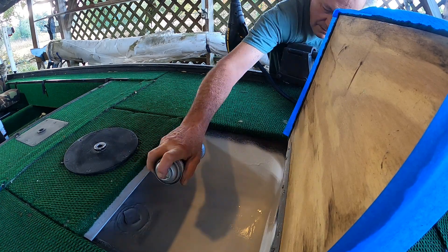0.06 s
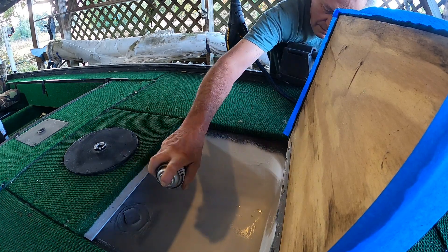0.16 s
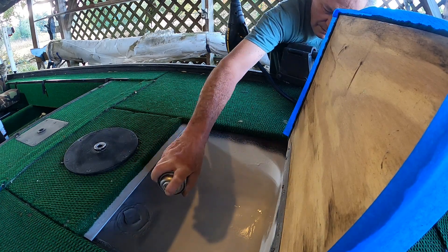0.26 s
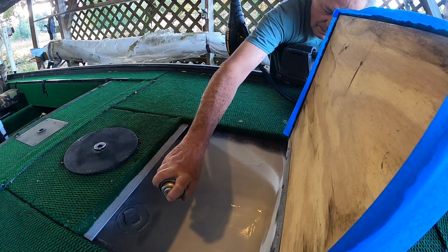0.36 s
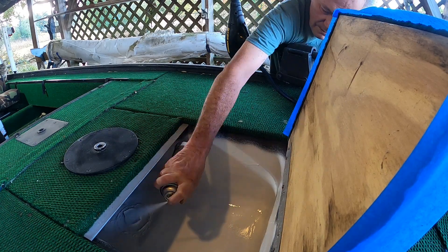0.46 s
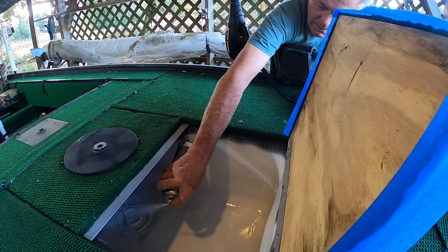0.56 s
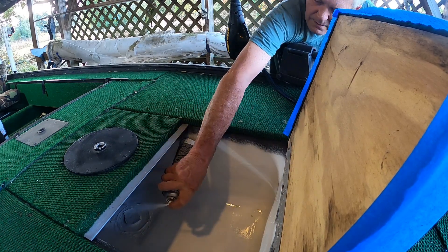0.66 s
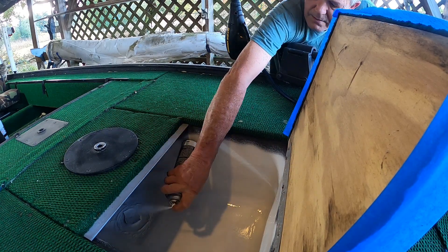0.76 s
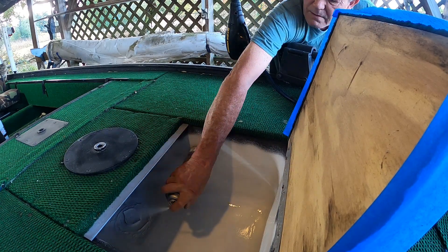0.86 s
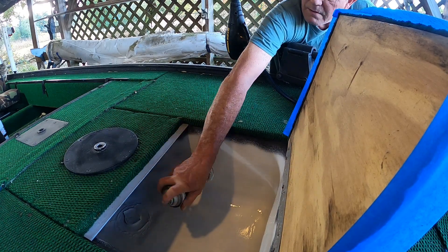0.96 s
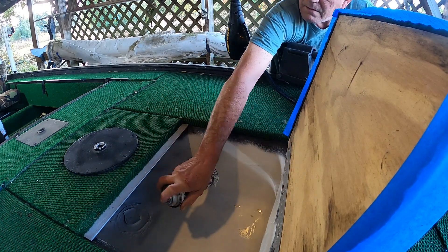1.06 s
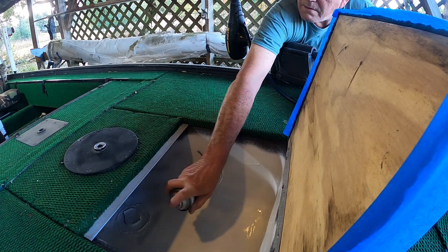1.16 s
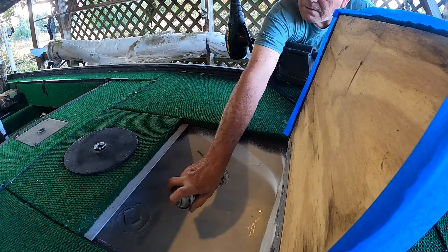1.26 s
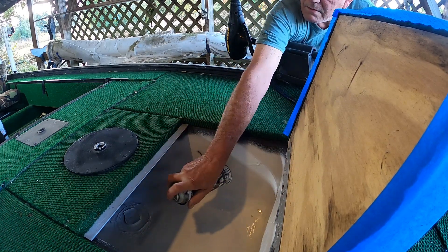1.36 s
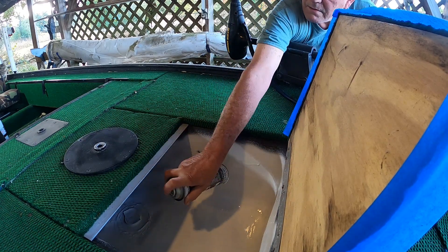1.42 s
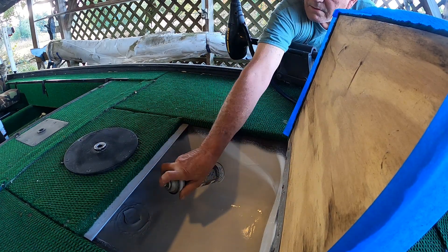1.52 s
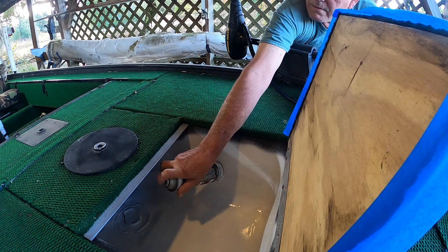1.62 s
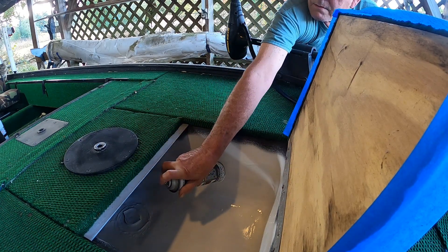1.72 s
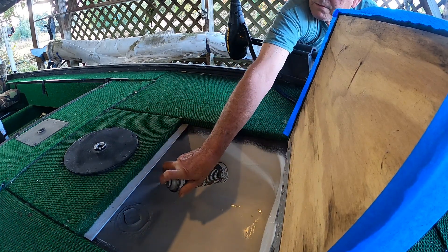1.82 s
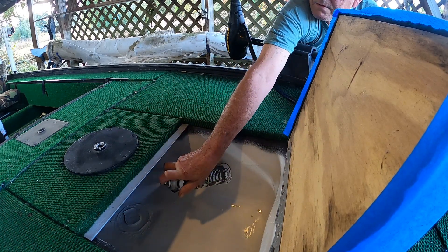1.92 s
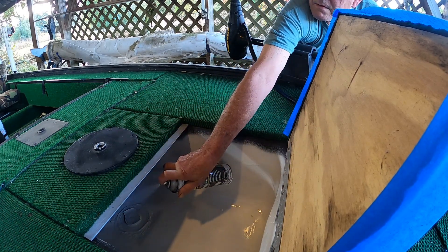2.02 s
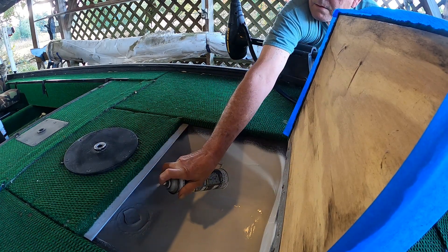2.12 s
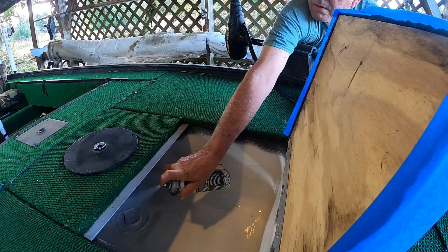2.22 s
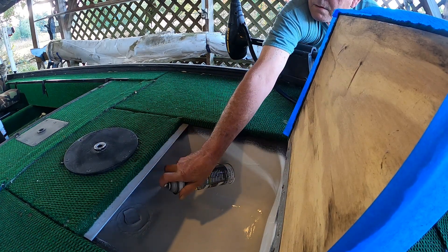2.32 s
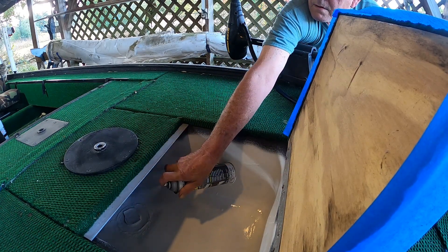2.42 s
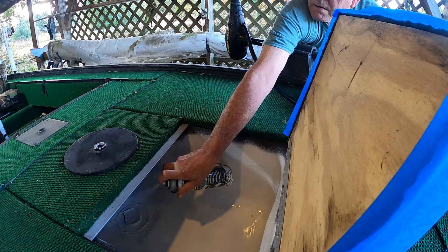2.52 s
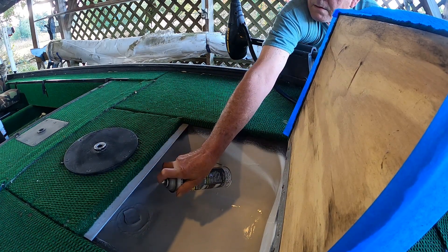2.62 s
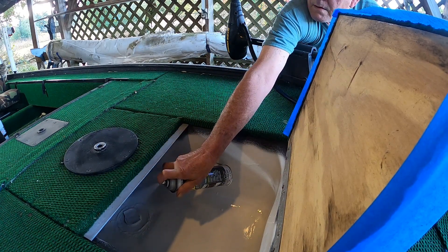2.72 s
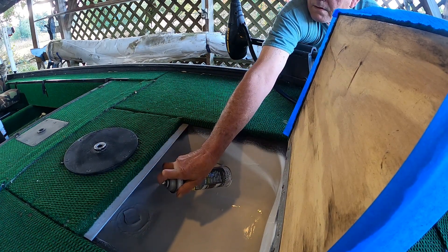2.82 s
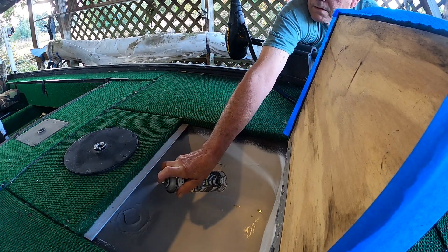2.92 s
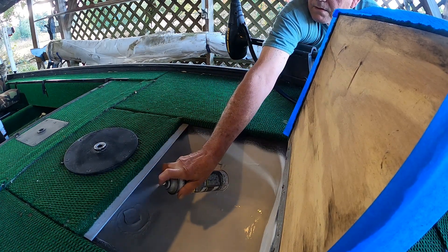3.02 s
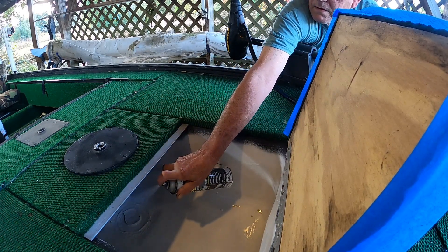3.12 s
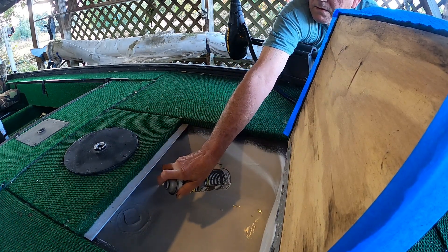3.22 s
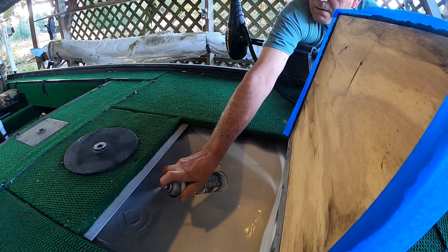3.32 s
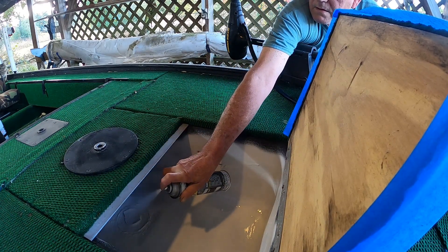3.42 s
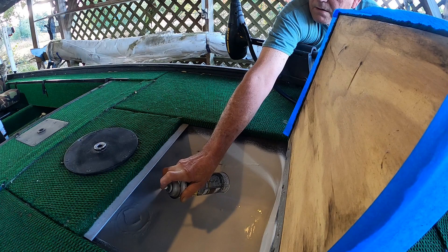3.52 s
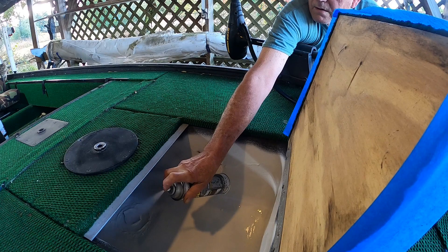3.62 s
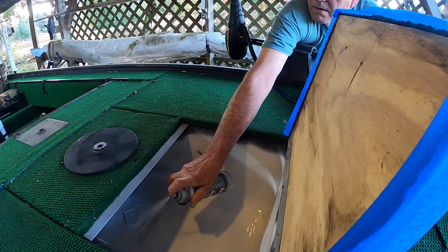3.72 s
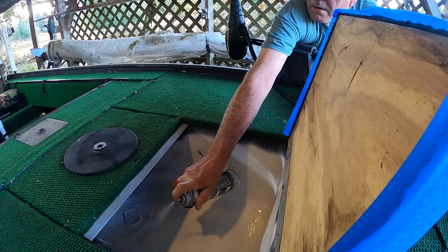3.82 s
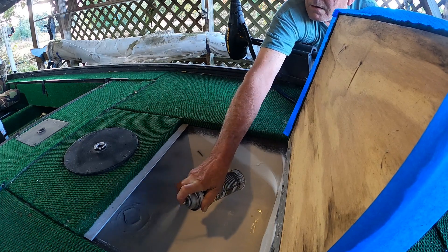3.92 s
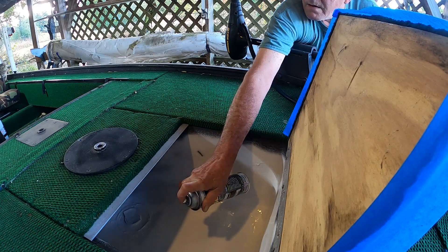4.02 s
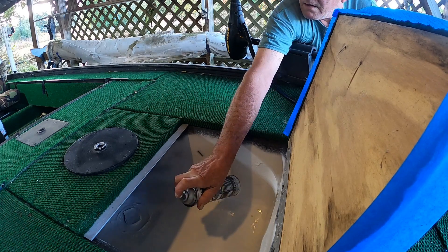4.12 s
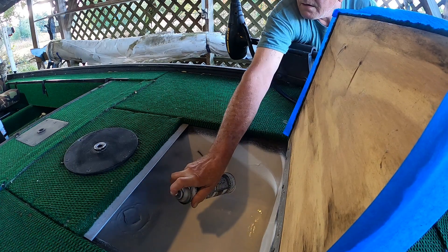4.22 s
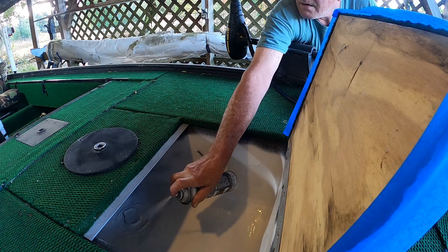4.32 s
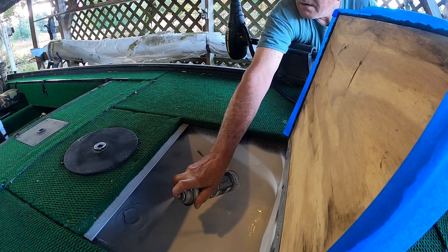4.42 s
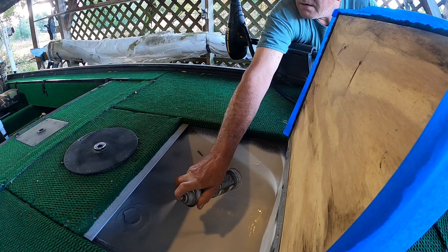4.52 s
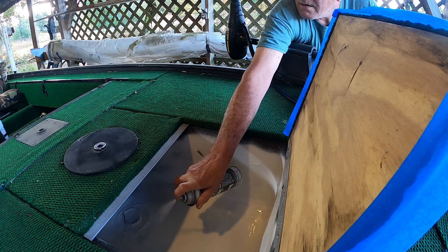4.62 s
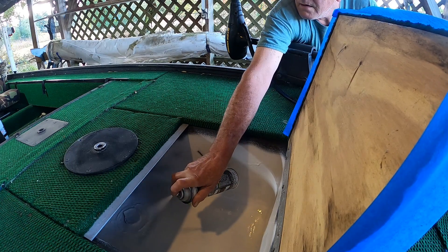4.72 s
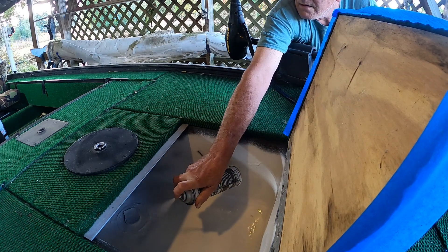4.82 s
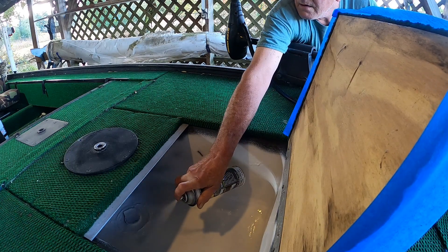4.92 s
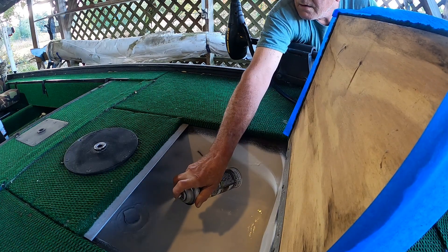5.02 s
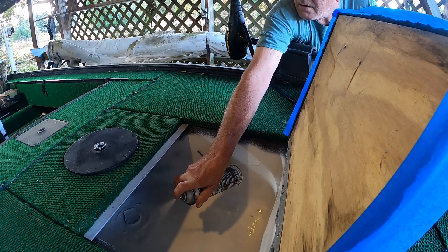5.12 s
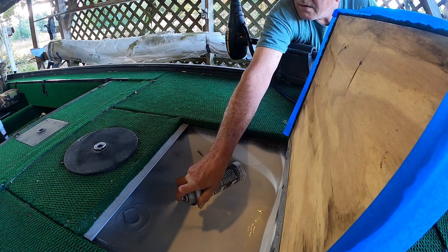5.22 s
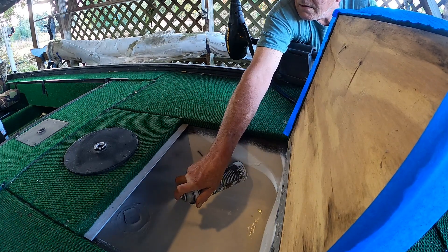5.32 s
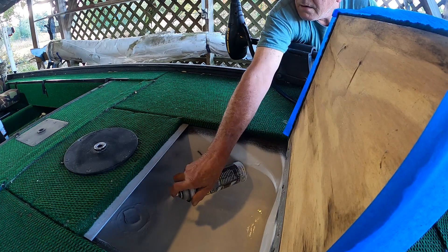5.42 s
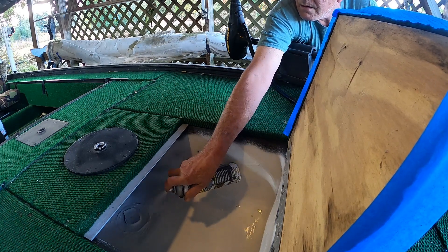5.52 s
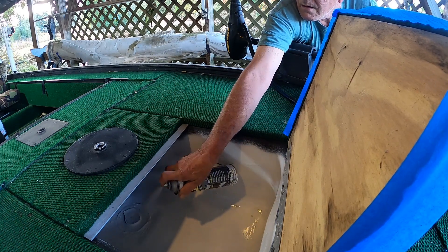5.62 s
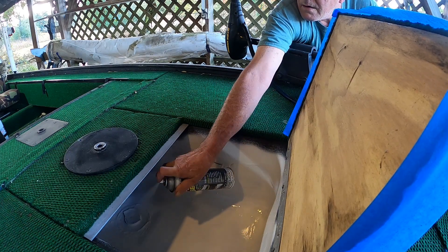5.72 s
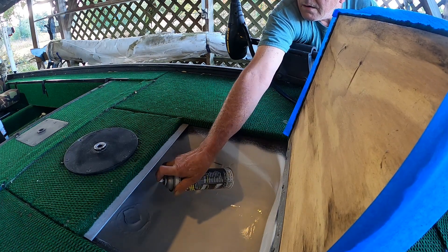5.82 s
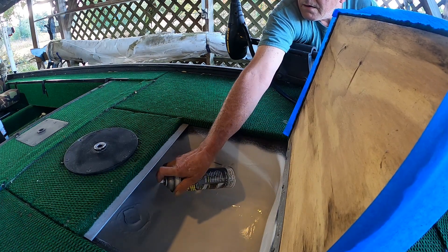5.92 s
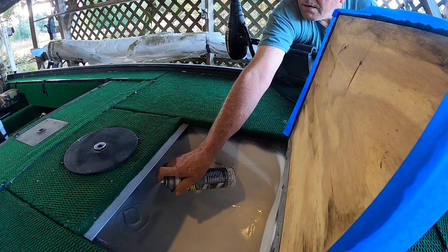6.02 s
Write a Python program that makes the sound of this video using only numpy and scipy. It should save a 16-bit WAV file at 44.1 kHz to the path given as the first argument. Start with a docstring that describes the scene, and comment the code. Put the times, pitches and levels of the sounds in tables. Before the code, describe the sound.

Bright, then duller spray-can hiss echoes in a small boat compartment, between woody thumps and a rising breeze rumbling close to the microphone.

```python
"""Faint handling ticks and a low wind rumble open the scene; then an aerosol can sprays into a boat hatch.
Spray: three passes of coloured noise start bright, the last two turn duller as the top fizz fades;
hatch echoes, resonances and gliding gap tones colour the hiss. Knocks: noise thuds, deck modes, hull boom.
Wind: low noise bands on the microphone follow a breeze, rising overall, and single gusts.
Can handling is short resonant noise; a short roof echo and faint air noise surround it all."""
import sys
import numpy as np
from scipy import signal
from scipy.fft import rfft, irfft, next_fast_len
from scipy.io import wavfile
from scipy.ndimage import map_coordinates

SR = 44100
rng = np.random.default_rng(int(sys.argv[2]) if len(sys.argv) > 2 else 0)


def generate_wav(sig):
    """Save sig (samples, or channels by samples) to the path in sys.argv[1] as 16-bit PCM at SR."""
    pcm = np.round(np.clip(np.atleast_2d(sig).T, -1, 1) * 32767).astype(np.int16)
    wavfile.write(sys.argv[1], SR, pcm)


N = 267246


def amp(db):
    """Decibels to gain."""
    return 10 ** (np.asarray(db) / 20)


def unit(x):
    """Scale to rms 1."""
    return x / np.sqrt(np.mean(x ** 2) + 1e-20)


def along(points, hz):
    """Interpolate (f/Hz, value) points on a log-frequency axis."""
    f, v = np.transpose(points)
    return np.interp(np.log(hz + 1), np.log(f + 1), v)


def curves(rows):
    """Interpolate each column after t/s to one value per sample."""
    s, *cols = np.transpose(rows)
    return [np.interp(np.arange(N) / SR, s, c) for c in cols]


def ramp(u):
    """Smooth step from 0 to 1 as u goes from 0 to 1."""
    return np.sin(np.pi / 2 * np.clip(u, 0, 1)) ** 2


def swell(s, length_s):
    """Bell-shaped rise and fall around time s; falls to exp(-2) at +-length_s."""
    return np.exp(-2 * ((np.arange(N) / SR - s) / length_s) ** 2)


def wobble(rate_hz):
    """Smooth random curve through rate_hz Gaussian knots a second."""
    coarse = np.arange(0, N + 64, 64)
    knots = rng.standard_normal(400)
    smooth = map_coordinates(knots, [coarse * rate_hz / SR], mode="mirror")
    return np.interp(np.arange(N), coarse, smooth)


def filtered(x, response):
    """Apply a gain response of frequency, zero-padded against wrap-around."""
    size = x.shape[-1]
    m = next_fast_len(size + SR // 4)
    spectrum = rfft(x, m) * response(np.fft.rfftfreq(m, 1 / SR))
    return irfft(spectrum, m)[..., :size]


def noise(spectrum, size=N):
    """Gaussian noise of rms 1 with the given spectral shape."""
    white = rng.standard_normal(size)
    return unit(filtered(white, lambda hz: amp(along(spectrum, hz))))


def add(track, s, sound):
    """Mix a sound into the track at time s."""
    part = track[round(s * SR):][:len(sound)]
    part += sound[:len(part)]


# faint hiss of the surroundings: t/s, level/dB
AMBIENCE_S_DB = [(.4, -70), (1.15, -62.5), (1.85, -58.5), (4.2, -68.5)]
# its spectral shape: f/Hz, relative level/dB per Hz
AIR_HZ_DB = [(200, 25), (600, 10), (1800, 7.5), (4000, 2.5), (7500, -0.5), (9500, -7.5), (12000, -48)]


def ambience():
    """Air noise of the surroundings, slowly changing in level."""
    level_db, = curves(AMBIENCE_S_DB)
    return amp(level_db) * noise(AIR_HZ_DB)


# breeze on the microphone: t/s, rumble level/dB
BREEZE_S_DB = [(0.0, -42.5), (0.86, -45.5), (1.1, -39), (2.28, -36.5), (2.56, -30.5), (3.14, -27.5),
               (3.53, -40), (3.91, -40), (5.13, -23.5), (6.06, -32.5)]
# single gusts: t/s, half-length/s, rumble level/dB, flutter re rumble/dB before trim
GUSTS = [(0.517, .09, -40.5, -4.5), (0.978, 0.065, -27, -1), (1.262, 0.102, -29.5, -20),
         (1.598, 0.048, -28, -20), (2.068, 0.1, -37, 6.5), (2.45, 0.055, -23, -12.5),
         (2.72, .1, -26.5, -11), (3.06, 0.2, -26, -5), (3.324, .12, -26.5, -9), (3.63, .08, -34, -23),
         (3.88, .1, -34, -9.5), (4.257, 0.098, -27, -11.5), (4.428, 0.12, -27.5, 0), (4.79, 0.14, -25, 7.5),
         (5.044, 0.11, -24, 5), (5.475, .14, -23, -3.5), (5.72, 0.33, -23.5, 0), (5.938, 0.091, -23, -10.5)]
# spectral shapes: f/Hz, relative level/dB per Hz
RUMBLE_HZ_DB = [(10, -11), (25, -2), (50, 1.5), (85, -4), (125, -4.5), (190, -19), (400, -82)]
FLUTTER_HZ_DB = [(60, -9), (120, 0.5), (165, 1), (220, -2.5), (300, -11.5), (450, -23.5), (800, -33.5),
                 (2000, -51.5), (5000, -87)]
BREEZE_FLUTTER_DB, FLUTTER_TRIM_DB = -6.5, -4.5  # breeze flutter re rumble before trim; trim of all flutter


def wind():
    """Gusts add in power to the breeze; large eddies rumble, small ones flutter in quick lumps."""
    breeze_db, = curves(BREEZE_S_DB)
    large, small = amp(breeze_db), amp(breeze_db + BREEZE_FLUTTER_DB)
    for s, length_s, db, flutter_db in GUSTS:
        gust = amp(db) * swell(s, length_s)
        large = np.hypot(large, gust)
        small = np.hypot(small, amp(flutter_db) * gust)
    eddies = wobble(25)
    rumble = large * unit(noise(RUMBLE_HZ_DB) * amp(1.02 * eddies))
    flutter = small * unit(noise(FLUTTER_HZ_DB) * amp(eddies + 2.77 * wobble(35)))
    return rumble + amp(FLUTTER_TRIM_DB) * flutter


# echo under the roof: f/Hz, t60/s
SHELTER_HZ_T60 = [(150, 0.37), (1000, 0.18), (4000, 0.13), (14000, 0.14)]


def shelter(x):
    """Short roof echo: convolution with noise decaying at its own t60 per frequency."""
    hz, t, z = signal.stft(rng.standard_normal(SR // 2), SR, nperseg=256)
    decay = amp(-60 * t / along(SHELTER_HZ_T60, hz)[:, None])
    tail = signal.istft(z * decay, SR, nperseg=256)[1]
    return signal.fftconvolve(x, tail / np.linalg.norm(tail))[:N]


# can and nozzle handling: t/s, level/dB, f/Hz, width/Hz, t60/s
CLICKS = [(.005, -60, 2840, 4000, 0.25), (0.085, -64, 2100, 1500, 0.48), (0.134, -63, 1930, 1490, 0.3),
          (0.288, -69.5, 1500, 1190, 0.31), (.573, -55.5, 2230, 355, 1), (1.089, -27.5, 1810, 2940, 0.04),
          (1.289, -58, 1590, 790, 0.046), (1.331, -47, 2170, 2980, 0.093)]
CLICK_RISE_S = .0005


def clicks():
    """Fingers tick on the nozzle and rub the can: decaying noise in one resonance each."""
    track, t = np.zeros(N), np.arange(SR // 4) / SR
    for s, db, hz, width_hz, t60_s in CLICKS:
        def colour(f):
            """Band-pass resonance with a treble roll-off."""
            return f * width_hz / np.hypot(hz ** 2 - f ** 2, f * width_hz) / (1 + (f / 7000) ** 2)

        tick = unit(filtered(rng.standard_normal(len(t)), colour))
        add(track, s, tick * amp(db - 60 * t / t60_s) * (1 - np.exp(-t / CLICK_RISE_S)))
    return track


# blows on the deck: t/s, level/dB, thud hardness/dB, mode tilt/(dB/octave)
KNOCKS = [(.866, -13, 8, -10), (0.876, -11, -15, -2), (0.997, -25.5, 3, 4.5), (1.022, -33, 11, -2),
          (1.759, -15.5, -2, -2.5), (1.795, -16.5, -14.5, -5), (2.534, -11.5, 0.5, -0.5),
          (2.55, -19.5, 1, -5), (2.583, -16, -3.5, -2), (5.41, -14, 5, -6.5), (5.65, -24.5, 7, 3)]
# deck modes: f/Hz, relative level/dB, t60/s
DECK_MODES = [(108.6, -1, .15), (137, -3, .2), (187, 1, 0.24), (300, -3.5, .22), (379, -20, 0.1),
              (447, -13.5, 0.24), (530, -14, 0.15), (962, -22, 0.068), (1207, -15.5, 0.091),
              (1715, -32, .1)]
# spectral shapes of thud and of the hull's many close modes: f/Hz, relative level/dB per Hz
THUD_HZ_DB = [(60, -50), (150, -4.5), (400, 1.5), (700, -7.5), (1000, 0.5), (1700, -9), (2500, -16),
              (5000, -31), (9000, -69.5)]
HULL_HZ_DB = [(60, -19), (130, 13.5), (250, -5.5), (400, -2), (700, -8.5), (2000, -68.5)]


def knocks(thud_t60_s=0.082, hull_t60_s=0.33, swell_s=0.0004, rise_s=0.0029, pivot_hz=170):
    """Each blow gives a short woody thud, rings the hollow deck's modes and booms the hull."""
    track, t = np.zeros(N), np.arange(SR // 2) / SR
    hz, mode_db, t60_s = np.transpose(DECK_MODES)[:, :, None]
    for s, db, hard_db, tilt in KNOCKS:
        # the spot struck sets the balance of low and high modes
        tilt_db = tilt * np.log2(hz / pivot_hz)
        scatter_db = 2 * rng.standard_normal(hz.shape)
        strength = amp(mode_db + tilt_db + scatter_db - 60 * t / t60_s)
        pitch_hz = hz * (1 + 0.0068 * rng.standard_normal(hz.shape))
        cycles = pitch_hz * t + rng.random(hz.shape)
        ring = amp(-7.5) * np.sum(strength * np.sin(2 * np.pi * cycles), axis=0)
        boom = noise(HULL_HZ_DB, size=len(t)) * amp(-14.0 - 60 * t / hull_t60_s)
        thud = noise(THUD_HZ_DB, size=len(t)) * amp(hard_db - 7.5 - 60 * t / thud_t60_s)
        body = (ring + boom) * (1 - np.exp(-t / swell_s))
        add(track, s, amp(db) * (body + thud * (1 - np.exp(-t / rise_s))))
    return track


# passes: open t/s, shut t/s, rise/s, fall/s, then hiss, sizzle, core level/dB before the
# offsets in spray(), then delay from opening to the middle of the dulling/s
VALVE_PASSES = [(0.59, 1.046, 0.063, .035, -29, -41.5, -29.5, 1.0),
                (1.898, 4.107, 0.068, .04, -28.5, -40, -36, 0.94),
                (4.482, 6.2, 0.075, .04, -26.5, -40.5, -42, .35)]
DULLING_S = 0.1


def valve():
    """The finger works the nozzle: flow 0-1, dullness 0-1, and the pass's hiss, sizzle, core dB."""
    t = np.arange(N) / SR
    flow, dull, levels_db = np.zeros(N), np.zeros(N), np.zeros((3, N))
    for on, off, rise, fall, hiss_db, sizzle_db, core_db, bright_s in VALVE_PASSES:
        flow = flow + ramp((t - on) / rise) * ramp(1 - (t - off) / fall)
        dull = np.where(t >= on, ramp((t - on - bright_s) / DULLING_S + .5), dull)
        levels_db = np.where(t >= on, [[hiss_db], [sizzle_db], [core_db]], levels_db)
    return flow, dull, levels_db


EASE_S, EASE_IN_S, EASE_OUT_S, EASE_DB = 2.585, 0.07, 0.22, -11.5


def ease():
    """The finger slackens once and presses again: one smooth dip, in dB."""
    t = np.arange(N) / SR
    return EASE_DB * ramp(1 + (t - EASE_S) / EASE_IN_S) * ramp(1 - (t - EASE_S) / EASE_OUT_S)


# echoes off hatch walls and raised lid: delay/s, gain before power normalization
WALLS_S_GAIN = [(.0018, 0.32), (.0032, 0.24), (.0049, .18), (.0061, 0.079)]


def reflections(x, scatter, sway_s, sway_rate_hz, longest_s, count=14):
    """Delayed copies off the hatch; path lengths wander with the hand, so ripples drift in the hiss."""
    draws = rng.random((count, 2))
    small = [(longest_s * (.1 + .9 * far), scatter * np.sign(side - .5)) for far, side in draws]
    paths = list(WALLS_S_GAIN) + small
    fine = signal.resample_poly(x, 4, 1)  # quarter-sample delays
    out = x.copy()
    for delay_s, gain in paths:
        at = np.arange(N) - SR * (delay_s + sway_s * wobble(sway_rate_hz))
        index = np.clip(np.round(4 * at).astype(int), 0, len(fine) - 1)
        out += gain * fine[index]
    return out / np.sqrt(1 + sum(gain ** 2 for _, gain in paths))


# air resonances of the hatch: f/Hz, width/Hz, lift/dB (overlaps add)
HATCH_MODES = [(1185, 200, 4), (1487, 87, 7), (1823, 79, 4.5), (1860, 27, 0), (2327, 46, 5),
               (3090, 14, -2.5), (3060, 160, -2), (3572, 55, 5), (4120, 340, -4), (4140, 60, 8.5),
               (4535, 200, -1.5), (4883, 80, 5.5), (4980, 170, -9.5), (5990, 170, 1), (7970, 640, 11),
               (8680, 240, -2)]


def hatch_response(f):
    """Peaks and dips that the hatch's air resonances impose on the jet."""
    return amp(sum(db / (1 + (2 * (f - hz) / width_hz) ** 2) for hz, width_hz, db in HATCH_MODES))


def gap_ring(hz, width_hz):
    """Jet-driven air around the can: narrow-band noise on a carrier at hz."""
    beats = unit(filtered(rng.standard_normal((2, N)), lambda f: 1 / (1 + (f / width_hz) ** 2)))
    phase = 2 * np.pi * np.cumsum(hz * np.ones(N)) / SR
    return beats[0] * np.cos(phase) + beats[1] * np.sin(phase)


# air gap between can and hatch floor: t/s, f/Hz, level re hiss setting/dB
GAP_S_HZ_DB = [(.62, 2900, -10.5), (1.05, 3455, -14), (2.4, 3390, -8.5), (3.3, 3480, -15.5),
               (3.6, 3000, -10.5), (3.85, 2712, -8), (4.55, 2614, -7), (5.33, 2700, -6.5), (5.58, 3048, -6),
               (5.72, 3260, -13), (6.05, 3670, -11)]
# its modes: multiple of f, relative level/dB
GAP_MODES = [(1, -1), (1.34, -11), (1.62, -8.5)]
# brief whistles of the jet: middle t/s, half-length/s, level re hiss setting/dB
WHISTLES = [(2.92, .26, -6.5), (3.38, .16, -8)]
# whistle tones: f/Hz, relative level/dB
WHISTLE_HZ_DB = [(3420, -3), (3868, 0), (4525, -2)]
GAP_WAVER_DB = 1.5


def rings():
    """Gap modes glide together as the can moves, each wavering in level; the jet whistles briefly."""
    hz, gap_db = curves(GAP_S_HZ_DB)
    gap = 0
    for multiple, db in GAP_MODES:
        level = amp(gap_db + db + GAP_WAVER_DB * wobble(12))
        gap = gap + level * gap_ring(multiple * hz, width_hz=148)
    tones = sum(amp(db) * gap_ring(tone_hz, width_hz=57) for tone_hz, db in WHISTLE_HZ_DB)
    return gap + tones * sum(amp(db) * swell(s, length_s) for s, length_s, db in WHISTLES)


# nozzle turning towards and away from the microphone: t/s, treble level/dB
AIM_S_DB = [(.65, 2), (1.0, -0.5), (2.0, 0), (2.7, 0), (3.4, 2.5), (4.1, 0.5), (5.0, 0), (5.7, 0),
            (6.05, -3.5)]
# spectral shapes of the jet's layers: f/Hz, relative level/dB per Hz
HISS_HZ_DB = [(1500, -27.5), (2300, -5.5), (2800, -1.5), (3600, -3), (4500, 0.5), (5200, -0.5),
              (6000, -16.5), (7500, -40), (10000, -60.5)]
RUSH_HZ_DB = [(200, -72), (500, -18), (850, 0.5), (1400, 2), (2100, 6), (2600, -2.5), (3500, -5),
              (6000, -51)]  # on the hatch floor
SIZZLE_HZ_DB = [(3500, -55.5), (5200, -3.5), (6200, 8), (7200, 4.5), (8000, -3.5), (9000, 3.5),
                (10600, 1.5), (11800, -6), (14000, -31)]
CORE_HZ_DB = [(2400, -31), (3000, -0.5), (4000, 0.5), (4900, -0.5), (5500, -37)]  # narrow core of the hiss
FIZZ_HZ_DB = [(8500, -66), (11000, 7.5), (12800, 12), (14300, 6), (15700, -2)]
SPREAD_HZ_DB = [(150, -5.5), (800, -1), (1800, -31), (7000, -28.5), (9000, -2), (10500, 5.5), (13000, 9.5),
                (15500, -5)]  # left-right difference
RUSH_DB, FIZZ_DB = -40, -37  # while bright; fizz before its layer offsets
DULL_HISS_DB, DULL_RUSH_DB, DULL_SIZZLE_DB, DULL_FIZZ_DB = 3, 3, 1, -20.5  # change from bright to dull
EASE_RUSH, EASE_SIZZLE = 0.72, 0.85  # share of the dip: rush; sizzle and fizz
AIM_HISS, AIM_FIZZ = 1.33, 1.6  # share of the aim: hiss; fizz


def spray():
    """Turbulent jet as noise layers, sputtering with droplets and coloured by the hatch, in stereo."""
    opening, dull, (pass_db, pass_sizzle_db, core_db) = valve()
    aim_db, = curves(AIM_S_DB)
    ease_db = ease()
    hiss_db = pass_db + DULL_HISS_DB * dull + ease_db + AIM_HISS * aim_db
    rush_db = RUSH_DB + DULL_RUSH_DB * dull + EASE_RUSH * ease_db
    sizzle_db = pass_sizzle_db + DULL_SIZZLE_DB * dull + EASE_SIZZLE * ease_db + aim_db
    fizz_db = FIZZ_DB + DULL_FIZZ_DB * dull + EASE_SIZZLE * ease_db + AIM_FIZZ * aim_db
    sputter_db = .5 * noise([(10, 7), (150, -3.5), (600, -21.5), (2000, -53.5)])
    flow = opening * amp(sputter_db)

    hiss = amp(hiss_db - 4.5) * noise(HISS_HZ_DB)
    rush = amp(rush_db) * noise(RUSH_HZ_DB)
    sizzle = amp(sizzle_db) * noise(SIZZLE_HZ_DB)
    core = amp(core_db + ease_db) * noise(CORE_HZ_DB)
    jet = reflections(flow * (hiss + rush + sizzle + core),
                      scatter=0.25, sway_s=.00006, sway_rate_hz=4, longest_s=.012)
    ring = flow * amp(hiss_db) * rings()
    fizz = reflections(flow * amp(fizz_db - 7.5) * noise(FIZZ_HZ_DB),
                       scatter=.16, sway_s=.00003, sway_rate_hz=5.2, longest_s=0.0021)
    # faint left-right difference noise, following the fizz level
    spread = flow * amp(fizz_db - 12.0) * noise(SPREAD_HZ_DB)
    centre = filtered(jet, hatch_response) + ring
    return centre + fizz * amp([[-2.6], [2.2]]) + spread * np.array([[-1], [1]])


def scene():
    """Spray, knocks and clicks with their roof echo, plus wind and faint air."""
    near = spray() + knocks() + clicks()
    echo = amp(-10) * shelter(near.mean(axis=0))
    return near + echo + wind() + ambience()


TOP_HZ = 15800


def record(dry):
    """Band limit: removes everything from TOP_HZ up."""
    return filtered(dry, lambda hz: hz < TOP_HZ)


dry = scene()
out = record(dry)
generate_wav(out)
```